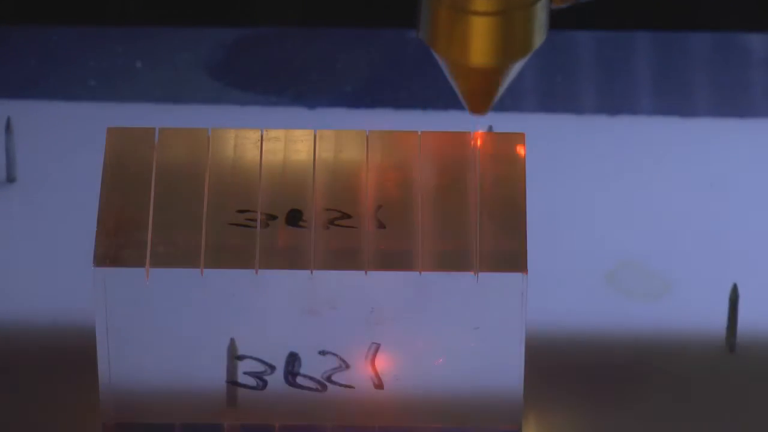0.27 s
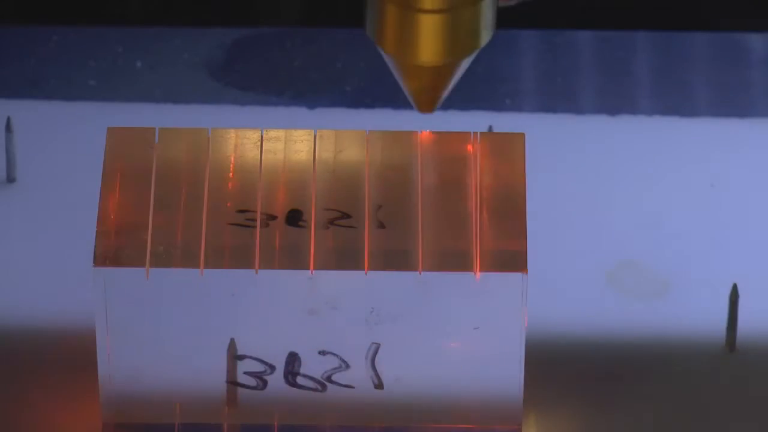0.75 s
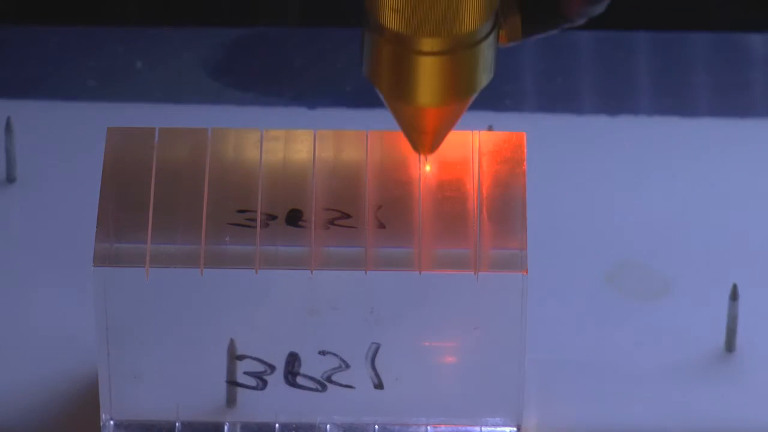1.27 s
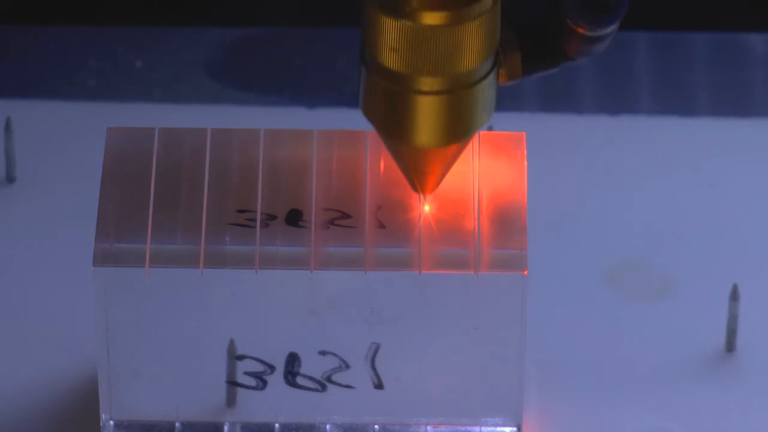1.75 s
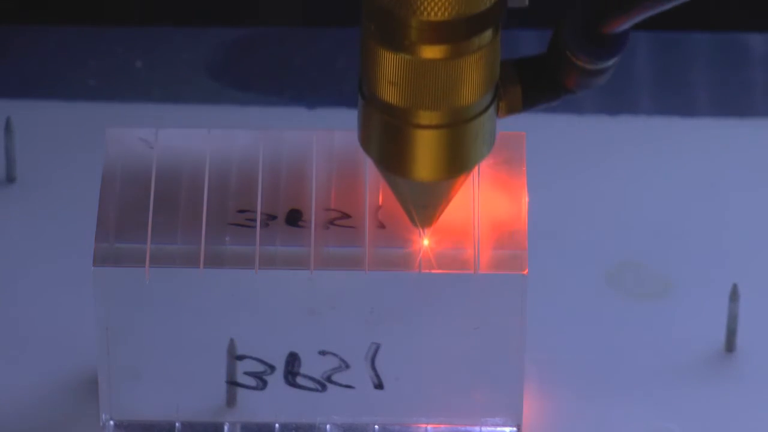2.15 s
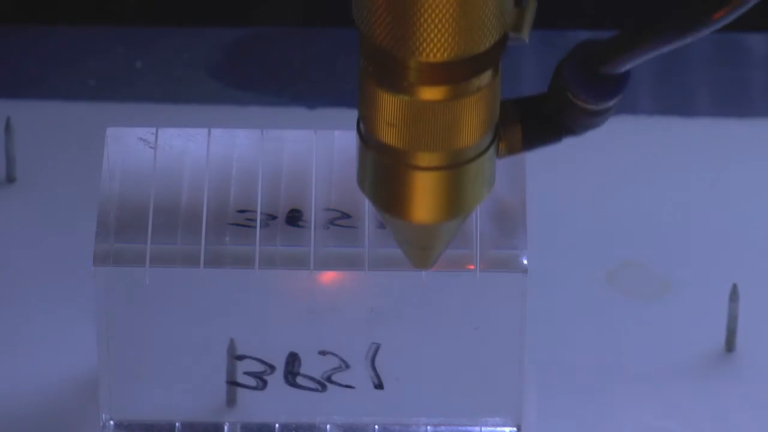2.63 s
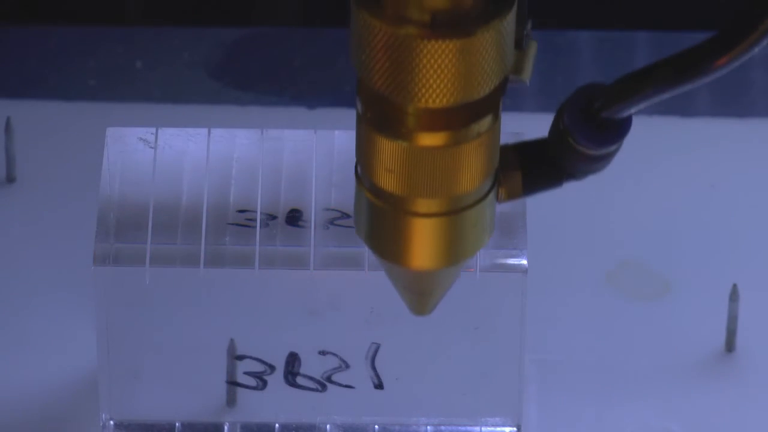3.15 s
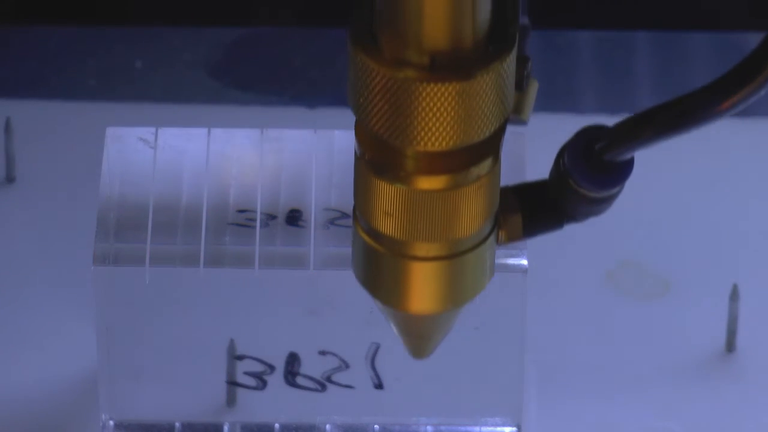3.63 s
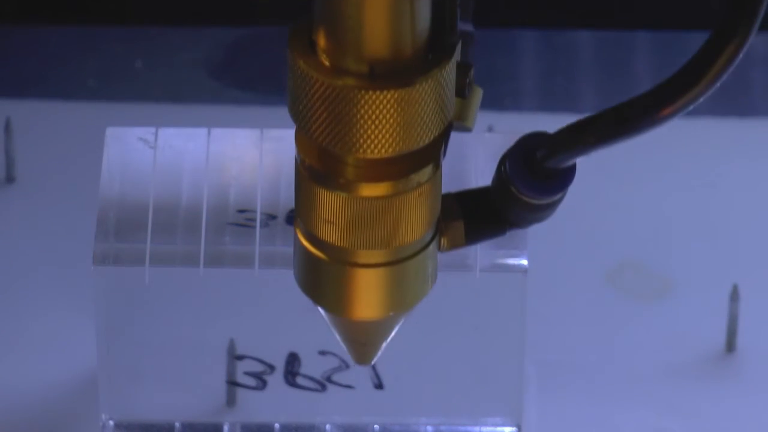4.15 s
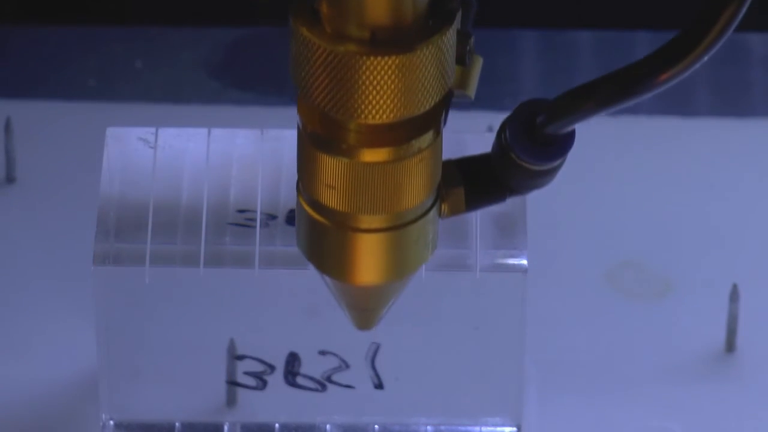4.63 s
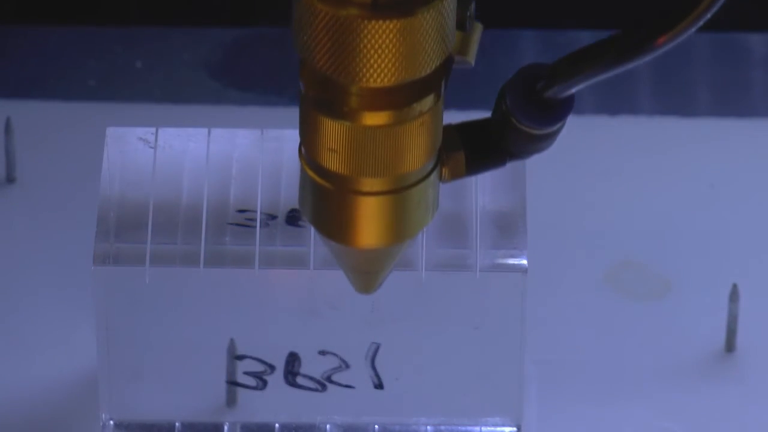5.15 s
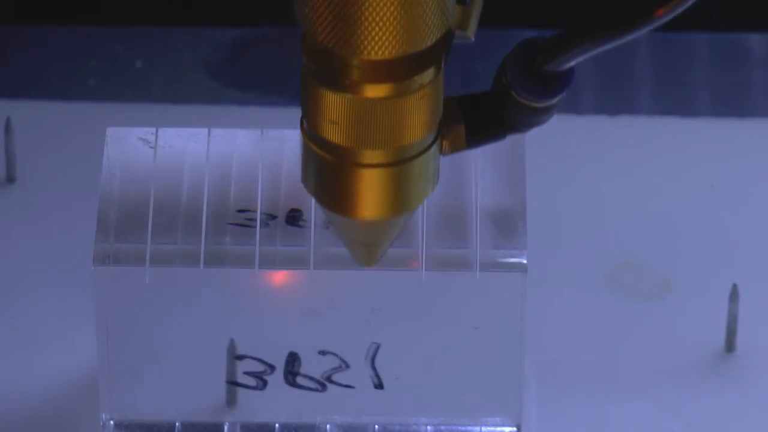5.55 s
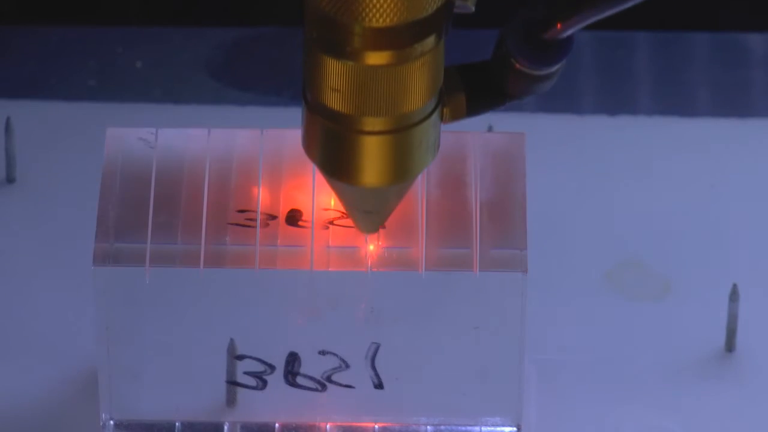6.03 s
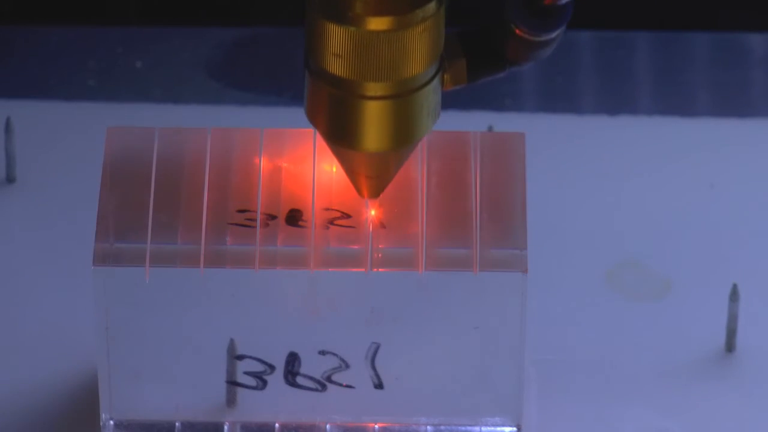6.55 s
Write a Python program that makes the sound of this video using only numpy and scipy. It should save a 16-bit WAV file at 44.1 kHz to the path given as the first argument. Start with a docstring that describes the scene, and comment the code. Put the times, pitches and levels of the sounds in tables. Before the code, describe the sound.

Close inside a metal cabinet, a laser cutter runs: a buzzy, throbbing air-pump drone, rushing exhaust fan and sharp jet hiss. The head's motor hums low, stops and jolts the frame at half a second, then hums higher on a long pass. The hiss dulls as the nozzle leaves the plastic block. Another turn thuds near four seconds, the hum settles in between, and brief breathy hoots come near the end.

```python
"""A laser cutter slices a clear plastic block for about seven seconds, heard from inside its cabinet.
From the start a looped stroke waveform drones and throbs as the air pump, and coloured noise is fan and jet.
The head is already moving back, a low step-rate hum; at half a second it turns, steps aside and jolts the frame.
A long pass to the front dims the hiss past the block's edge; a brief whistle sounds near one second.
After the second turn, near four seconds, the head comes back over the block; hoots of narrow noise end it."""
import sys
import numpy as np
from scipy import signal
from scipy.fft import rfft, irfft, next_fast_len
from scipy.io import wavfile

SR = 44100
rng = np.random.default_rng(int(sys.argv[2]) if len(sys.argv) > 2 else 0)


def dump_mix(stems):
    """Bounce the given channels to the path in sys.argv[1] as a 16-bit WAV at rate SR."""
    frames = np.atleast_2d(stems).T  # one column per channel
    limited = np.clip(frames, -1, 1)  # hard clip at full scale
    pcm = np.round(limited * 32767).astype(np.int16)
    wavfile.write(sys.argv[1], SR, pcm)


N = 299439

# straight passes of the head, positive towards the front: start_s, stop_s, speed_mm_per_s
CUTS = [(-.1, .542, -15), (.722, 3.988, 25), (4.168, 7, -20)]
STROKE_HZ = 46.117   # mean rate of the pump
STEPS_PER_MM = 8.625   # motor steps per millimetre of travel


def from_db(db):
    """Turn decibels into an amplitude gain."""
    return 10 ** (np.asarray(db) / 20)


def rms_one(x):
    """Scale to unit rms."""
    return x / np.sqrt(np.mean(x ** 2) + 1e-20)


def seconds():
    """Give the time of every sample."""
    return np.arange(N) / SR


def at_hz(points, hz):
    """Read a curve of (frequency, value) points on a log-frequency axis."""
    freq, value = np.transpose(points)
    return np.interp(np.log(np.maximum(hz, 1)), np.log(freq), value)


def bell(x, centre, reach):
    """Draw a bell curve of height 1 that falls to 1/e at its reach."""
    return np.exp(-((x - centre) / reach) ** 2)


def between(x, low, high, soft):
    """Rise from 0 to 1 between two bounds, with soft edges."""
    return (np.tanh((x - low) / soft) - np.tanh((x - high) / soft)) / 2


def drift(rate):
    """Wander at random around 0, by straight lines between rate new values a second."""
    knots = rng.standard_normal(1024)
    return np.interp(seconds() * rate, np.arange(len(knots)), knots)


def air_noise(spectrum):
    """Make stereo turbulence of a given colour at rms 1, the channels alike to a different degree by pitch."""
    # likeness of left and right: pitch_hz, correlation (-1 to 1)
    stereo_likeness = [(30, -0.39), (70, -0.34), (130, 0.62), (500, 0.56), (1000, 0.43), (2000, 0.74),
                       (4000, 0.93), (8000, 0.98), (12000, 0.51)]
    size = next_fast_len(N)
    hz = np.arange(size // 2 + 1) * SR / size
    mid, side = rfft(rng.standard_normal((2, size)))
    alike = np.clip(at_hz(stereo_likeness, hz), -1, 1)
    pair = np.sqrt(1 + alike) * mid + np.sqrt(1 - alike) * side * [[1], [-1]]
    # fade the noise beyond both ends of the colour curve
    low_skirt = np.minimum(hz / spectrum[0][0], 1) ** 2
    high_skirt = np.minimum(spectrum[-1][0] / (hz + 1), 1) ** 2
    coloured = pair * low_skirt * high_skirt * from_db(at_hz(spectrum, hz))
    return rms_one(irfft(coloured, size)[:, :N])


def narrow_noise(hz, width_hz):
    """Pass noise twice through one resonance, for a breathy band at rms 1."""
    r = np.exp(-np.pi * width_hz / SR)
    section = [1 - r, 0, r - 1, 1, -2 * r * np.cos(2 * np.pi * hz / SR), r * r]
    return rms_one(signal.sosfilt([section, section], rng.standard_normal(N)))


def running(start, stop):
    """Give the share of full speed of a motor that ramps up, runs and ramps down."""
    ramp_s = .03   # half speed falls on start and stop
    return np.clip(np.minimum(seconds() - start, stop - seconds()) / ramp_s + .5, 0, 1)


def turns():
    """List the moments at which the head stops to turn."""
    return [stop for _, stop, _ in CUTS[:-1]]


def pump(strokes):
    """Repeat one waveform every stroke; the motor's slip against the mains makes it throb."""
    # lower drone, before its trim: multiple of stroke rate, level_db, left_minus_right_db
    drone_lines = [(1, -63.0, -6), (2, -53.0, 1), (3, -50.0, -1), (4, -39.8, -3), (5, -50.1, -2),
                   (6, -47.6, -1), (7, -39.1, -4), (8, -43.0, -5), (9, -38.1, 2), (10, -39.0, -2),
                   (11, -51.2, -4), (12, -31.3, 0), (13, -32.8, -2), (14, -43.6, 14), (15, -37.9, 3),
                   (16, -30.3, -2), (17, -27.0, 1), (18, -30.5, 0), (19, -33.2, 1), (20, -47.3, 11),
                   (21, -44.4, 4), (22, -50.9, 12), (23, -46.5, 7), (24, -32.8, 4), (25, -49.6, 3),
                   (26, -36.7, 5), (27, -42.3, 3), (28, -51.1, 2), (29, -48.0, -3), (30, -43.3, 4),
                   (31, -43.4, 0), (32, -44.1, 4)]
    # mean level of the upper multiples (valve buzz), before its trim: pitch_hz, level_db per line
    valve_curve = [(1500, -54), (2100, -52.5), (2800, -53), (3500, -61.5), (4500, -68)]
    drone_trim_db, valve_trim_db, line_spread_db = 0.18, -2.1, 3
    beat_hz, beat_peak_s, throb_depth = 7.58, 0.03, 0.15
    phase_scatter_rad, throb_scatter_rad = .65, .7
    dispersion = .22   # strokes by which each multiple leads the one below
    flutter = 0.048   # random wander of the whole drone's gain
    size = 4096   # points in the stroke waveform

    upper = np.arange(len(drone_lines) + 1, 100)
    _, low_db, low_pan_db = np.transpose(drone_lines)
    valve_db = at_hz(valve_curve, upper * STROKE_HZ) + valve_trim_db
    valve_db = valve_db + rng.normal(0, line_spread_db, len(upper))
    level_db = np.r_[low_db + drone_trim_db, valve_db]
    pan_db = np.r_[low_pan_db, rng.normal(0, line_spread_db, len(upper))]
    count = len(level_db)

    # high notes run faster through the housing, so each stroke spreads into short falling bursts
    lead = dispersion * np.arange(count)
    phase = 2 * np.pi * np.cumsum(lead) + phase_scatter_rad * rng.standard_normal(count)
    lines = from_db(level_db + pan_db * [[.5], [-.5]]) * np.exp(1j * phase)
    # a weaker twin one beat above each line makes it swell, each at a moment of its own
    twins = lines * throb_depth * np.exp(1j * throb_scatter_rad * rng.standard_normal(count))

    place = (strokes % 1 * size).astype(int)

    def play(spectrum):
        waveform = np.fft.ifft(np.c_[np.zeros(2), spectrum], size)
        return np.sqrt(2) * size * waveform[:, place]

    beat = np.exp(2j * np.pi * beat_hz * (seconds() - beat_peak_s))
    drone = (play(lines) + play(twins) * beat).real
    return drone * (1 + flutter * drift(40))


def fan():
    """Rush exhaust air through the cabinet, as coloured noise with slight random gusts."""
    # colour of the rush: pitch_hz, relative level_db per Hz
    rush_colour = [(20, -24), (65, -15), (130, -16.5), (215, -6), (265, -12.5), (340, -3.5), (410, -2),
                   (520, -6.5), (680, -3), (800, 2), (960, -4.5), (1250, -3.5), (1600, -7), (3000, -13)]
    rush_db, gust_db = -27.0, 0.6
    return from_db(rush_db + gust_db * drift(11)) * air_noise(rush_colour)


def low_hums():
    """Hold a few steady sines, each from a random phase."""
    # steady low hums of the machine, one beside a pump multiple: pitch_hz, level_db
    steady_hums = [(76.8, -62), (145.9, -50), (299.5, -50.5)]
    out = np.zeros(N)
    for hz, db in steady_hums:
        out += np.sqrt(2) * from_db(db) * np.sin(2 * np.pi * (hz * seconds() + rng.random()))
    return out


def motor(speed, hum_db):
    """Hum at the stepper's step rate, which follows the speed in mm per second."""
    # partials of the hum, before the rail's high-pass: multiple of step rate, relative level_db
    step_partials = [(.5, -8), (1, 0), (2, -11)]
    waver_db = 1.5
    steps = np.cumsum(np.abs(speed)) * STEPS_PER_MM / SR
    hum = sum(from_db(db) * np.sin(2 * np.pi * k * steps) for k, db in step_partials)
    # the narrow rail radiates little bass
    hum = signal.sosfilt(signal.butter(4, 110, "high", fs=SR, output="sos"), hum)
    return np.sqrt(2) * hum * from_db(hum_db + waver_db * drift(14))


def gantry(speed, head_mm):
    """Drive the cuts along the rail with one motor; a second steps sideways at each turn."""
    # how loudly the rail sings with the head at 0 mm: step_rate_hz, level_db
    rail_response = [(129, -46.5), (172, -38), (216, -39.5)]
    rail_db_per_mm = -0.0145   # fades as the head moves to the front
    step_delay_s, step_length_s, step_mm_per_s, step_db = .025, .125, 28, -37
    rail_db = at_hz(rail_response, np.abs(speed) * STEPS_PER_MM) + rail_db_per_mm * head_mm
    aside = np.zeros(N)
    for stop in turns():
        begin = stop + step_delay_s
        aside += running(begin, begin + step_length_s)
    return motor(speed, rail_db) + motor(step_mm_per_s * aside, step_db)


def jet_levels(head_mm):
    """Set hiss in the cut, spray and whistle (dB) by what lies under the nozzle."""
    # edges of the block along the head's path: back_mm, front_mm
    back, front = (-6.2, 38.5)
    jet_core_mm, jet_skirt_mm, edge_strip_mm = 1.2, 7.2, 6.6
    # hiss in the cut: in free air, added at the front edge, rise towards it, extra at the breakout
    kerf_free_db, kerf_block_db, kerf_db_per_mm, breakout_db = -42, -35, 0.24, 2
    # spray: in free air, over the block's face, close inside an edge
    spray_free_db, spray_face_db, spray_edge_db = -46, -41, -38
    # thin whistle: usual level, and its swell around one place on the bed
    whistle_db, swell_db, swell_at_mm, swell_reach_mm = -58.5, 6.5, 63, 13

    on_block = between(head_mm, back, front, jet_core_mm)
    inner = between(head_mm, back + edge_strip_mm, front - edge_strip_mm, jet_core_mm)
    # the jet blows out through the front edge
    breakout = between(head_mm, front - edge_strip_mm, front, jet_core_mm)
    cutting_db = kerf_block_db + kerf_db_per_mm * (head_mm - front) + breakout_db * breakout
    under_skirt = between(head_mm, back, front, jet_skirt_mm)
    cut_db = 20 * np.log10(from_db(kerf_free_db) + from_db(cutting_db) * under_skirt)
    face_db = spray_free_db * (1 - on_block) + spray_edge_db * (on_block - inner) + spray_face_db * inner
    return cut_db, face_db, whistle_db + swell_db * bell(head_mm, swell_at_mm, swell_reach_mm)


def cabinet(x, head_mm):
    """Comb the hiss with echoes off the metal walls; the comb slides as the head travels."""
    sound_mm_s, echo_gain, count = 343000, .25, 10
    sample, out = np.arange(N), x.copy()
    for far, slant, sign in rng.random((count, 3)):
        # the path grows or shrinks with travel, by the slant of the wall
        delay_s = .0018 + .0065 * far + 2 * (2 * slant - 1) * head_mm / sound_mm_s
        echo = np.array([np.interp(sample - delay_s * SR, sample, side) for side in x])
        out += echo_gain * np.sign(sign - .5) * echo
    return np.std(x) * rms_one(out)   # the echoes leave the overall level alone


def nozzle(strokes, head_mm):
    """Hiss as a jet of noise pulsing a little with the pump, and spray where it meets the block."""
    # colours of the air in hose and nozzle, the cut, and the spray: pitch_hz, relative level_db per Hz
    air_colour = [(900, -9.5), (1600, -5.5), (2000, 2.5), (2650, -5.5), (3100, -1), (3500, 0), (4300, -8.5),
                  (5700, -6), (6500, -0.5), (7000, -4.5), (8000, -0.5), (8600, -12.5), (10500, -26.5),
                  (15500, -27)]
    kerf_colour = [(2000, -23), (3700, 1.5), (4700, 1.5), (6000, -9), (8000, -13), (10000, -35)]
    spray_colour = [(4000, -1.5), (8500, 3), (10000, 0), (12000, -6), (14000, -5), (15700, -19)]
    air_db, pulsing, flicker_db = -30.0, 0.023, 1.01
    cut_db, face_db, whistle_db = jet_levels(head_mm)
    air = from_db(air_db) * air_noise(air_colour) * (1 + pulsing * np.cos(2 * np.pi * strokes))
    kerf = from_db(cut_db) * air_noise(kerf_colour)
    spray = from_db(face_db) * air_noise(spray_colour)
    whistle = from_db(whistle_db) * narrow_noise(12940, width_hz=300)
    return cabinet(air + kerf + spray, head_mm) * from_db(flicker_db * drift(20)) + whistle


def hiss_swells(head_mm):
    """Swell narrow bands of hiss, and one broad band of spray, as the head nears each place."""
    # place_mm, reach_mm, pitch_hz, width_hz, level_db at the place
    swell_bands = [(-3.5, 6.5, 8260, 200, -42), (-5, 6.6, 6520, 200, -43), (-1, 3, 2410, 60, -38),
                   (26, 22, 3630, 450, -42), (19, 11, 7850, 150, -42), (23, 13, 4740, 250, -49),
                   (36.5, 5.3, 9900, 1400, -50), (40, 8, 6520, 130, -42), (64, 18, 8020, 150, -46),
                   (50, 20, 3516, 120, -41), (71, 13, 6270, 250, -44)]
    out = np.zeros(N)
    for place, reach, hz, width, db in swell_bands:
        out += from_db(db) * bell(head_mm, place, reach) * narrow_noise(hz, width)
    return out


def ring(clicks, hz, t60):
    """Let a unit click set a sine of height 1 ringing, down 60 dB after t60 seconds."""
    r, w = np.exp(-np.log(1000) / (t60 * SR)), 2 * np.pi * hz / SR
    return signal.lfilter([0, np.sin(w)], [1, -2 * r * np.cos(w), r * r], clicks + 1e-18)


def frame():
    """Ring every mode of the gantry frame at each jolt, with a strength of its own."""
    # modes, before the band-pass: pitch_hz, relative level_db, t60_s
    frame_modes = [(122, -2, 0.12), (200, -4, 0.24), (237, -3.5, 0.22), (394, -18, .25)]
    # jolts as the head stops, steps aside, halts and sets off, before the band-pass:
    # after_stop_s, level_db
    turn_jolts = [(0, -27.5), (.033, -34), (.105, -33), (.175, -33)]
    jolts = [(stop + after, db) for stop in turns() for after, db in turn_jolts]
    start_s, jolt_db = np.transpose(jolts)
    spread_db = rng.normal(0, 3.1, (len(start_s), len(frame_modes)))
    out = np.zeros(N)
    for k, (hz, mode_db, t60) in enumerate(frame_modes):
        clicks = np.zeros(N)
        clicks[np.round(start_s * SR).astype(int)] = from_db(jolt_db + mode_db + spread_db[:, k])
        out += ring(clicks, hz, t60)
    # the belt softens the blow; the thin frame radiates no deep bass
    return signal.sosfilt(signal.butter(2, [130, 450], "band", fs=SR, output="sos"), out)


def stray_tones():
    """Swell and fade a short whistle, then a few hoots, each of narrow noise."""
    # centre_s, reach_s (to 1/e on either side), pitch_hz, width_hz, level_db at the centre
    brief_tones = [(1.047, 0.11, 6600, 50, -35), (5.87, .085, 912, 70, -33), (6.17, .07, 920, 80, -30),
                   (6.77, .07, 884, 40, -34)]
    out = np.zeros(N)
    for centre, reach, hz, width, db in brief_tones:
        out += from_db(db) * bell(seconds(), centre, reach) * narrow_noise(hz, width)
    return out


def scene():
    """Mix all layers; the head's travel drives the gantry, the jet and the swells of hiss."""
    speed = sum(mm_per_s * running(start, stop) for start, stop, mm_per_s in CUTS)
    head_mm = np.cumsum(speed) / SR
    # pump strokes so far, a little uneven
    strokes = STROKE_HZ * seconds() + 0.005 * drift(1.934) + 0.0013 * drift(46)
    machine = pump(strokes) + fan() + low_hums() + gantry(speed, head_mm)
    jet = nozzle(strokes, head_mm) + hiss_swells(head_mm)
    return machine + jet + frame() + stray_tones()


def record(dry):
    """Cut the top steeply with an elliptic low-pass."""
    return signal.sosfilt(signal.ellip(12, .1, 90, 15720, fs=SR, output="sos"), dry)


dry = scene()
out = record(dry)
dump_mix(out)
```